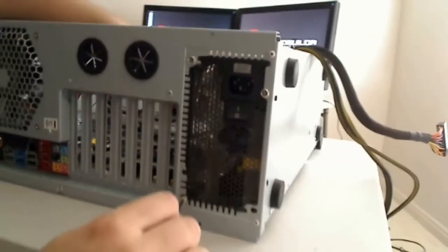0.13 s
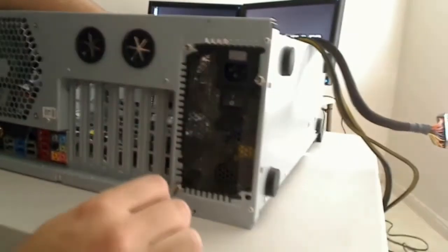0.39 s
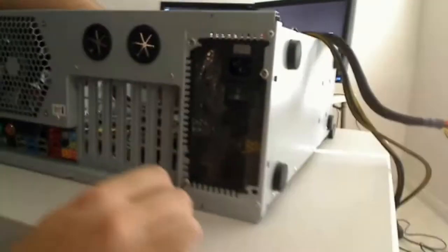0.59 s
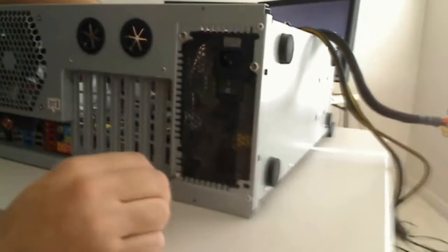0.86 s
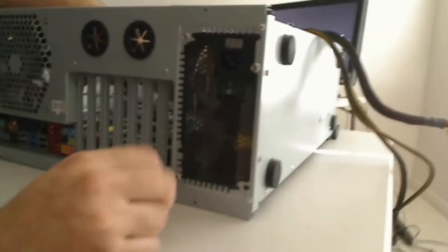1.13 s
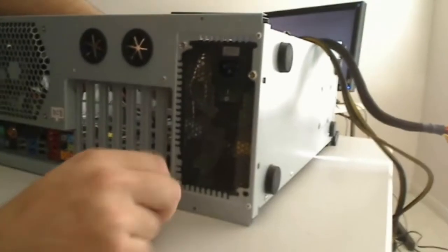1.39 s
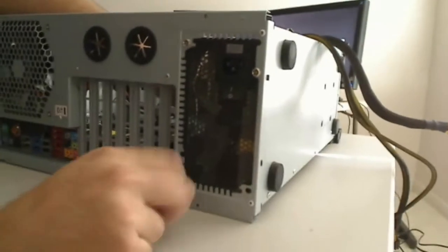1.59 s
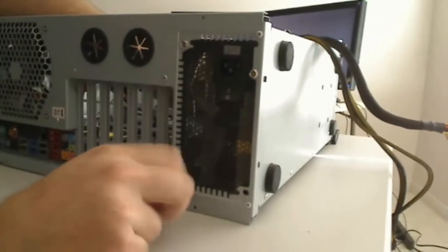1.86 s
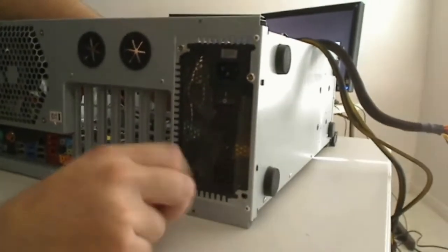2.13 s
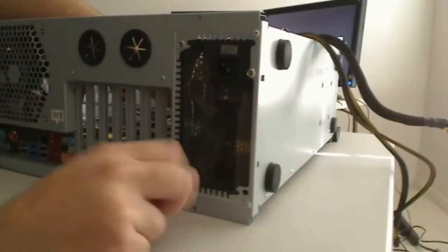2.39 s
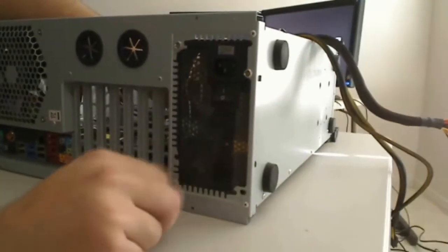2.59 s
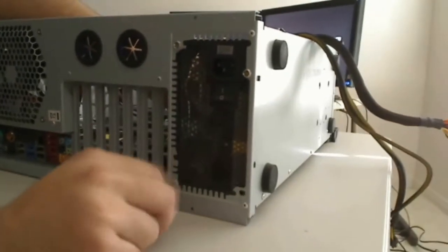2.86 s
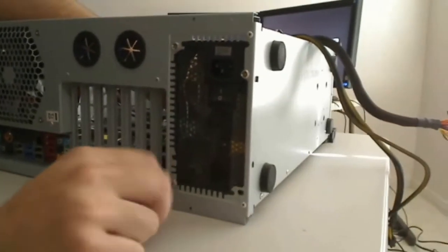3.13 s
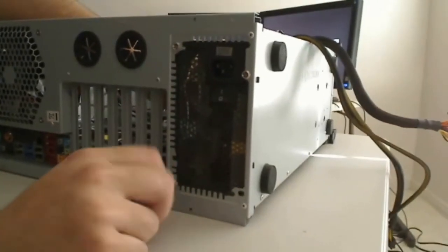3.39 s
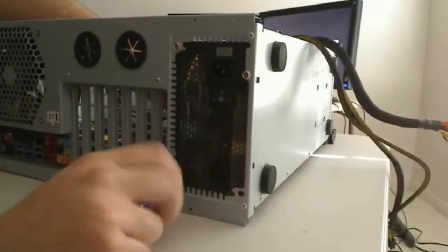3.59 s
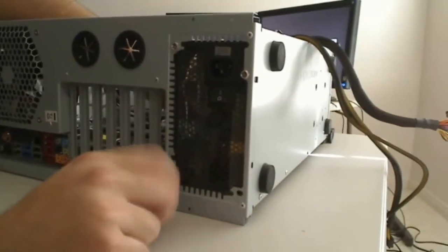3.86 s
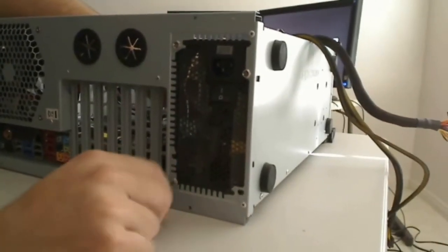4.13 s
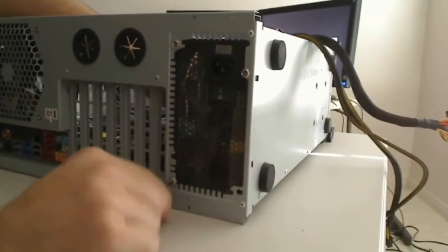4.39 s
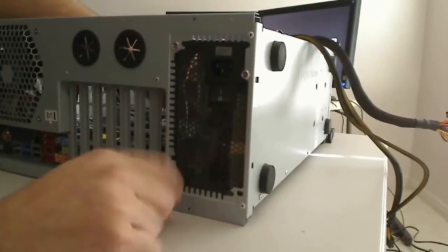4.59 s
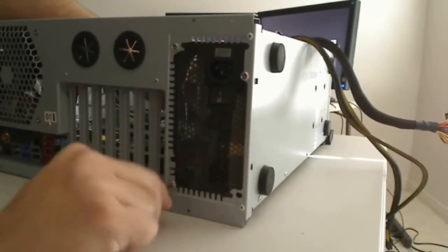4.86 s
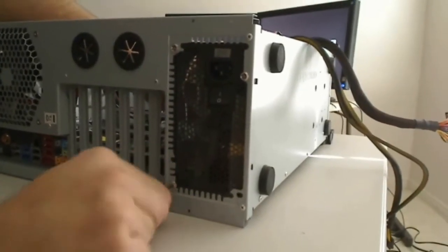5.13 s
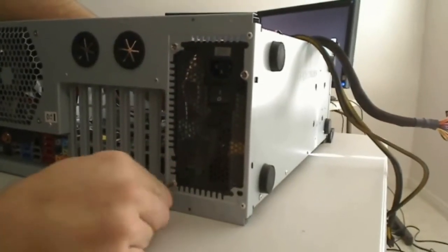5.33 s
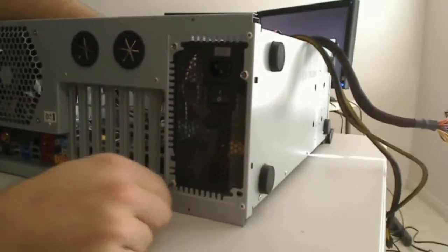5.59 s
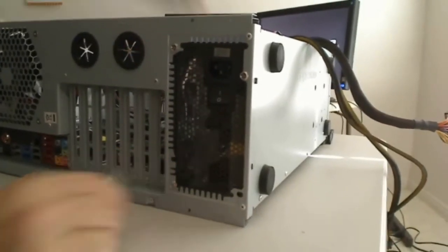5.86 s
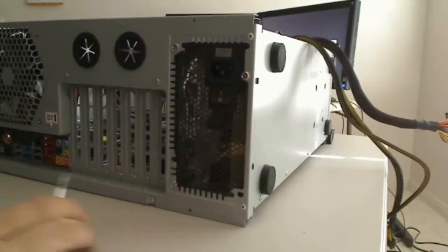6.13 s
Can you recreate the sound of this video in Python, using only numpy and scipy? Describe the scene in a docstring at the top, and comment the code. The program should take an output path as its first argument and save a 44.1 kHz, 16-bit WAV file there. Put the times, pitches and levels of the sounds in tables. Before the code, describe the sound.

A small screw is twisted into a thin steel case, with rapid bright clicks and gritty scratching in bursts over faint quiet room air.

```python
"""Screw turned into a computer case

A small screw is turned into the back of a steel computer case on a desk in a quiet room.
Each click of driver and screw feeds a short burst of energy into ringing bands of noise: the screw
briefly near 5 kHz, the sheet panels longer near 1 kHz. Scratching is a stream of tiny random grains
through the same bands. Jolts, soft bumps and a tail of echoes join in over a murmur of air and fans.
"""
import sys
import numpy as np
from scipy import signal
from scipy.io import wavfile

SR = 44100
rng = np.random.default_rng(int(sys.argv[2]) if len(sys.argv) > 2 else 0)


def store_pcm(level_fs):
    """Save levels as 16-bit WAV."""
    pcm = np.round(np.clip(level_fs, -1, 1) * 32767).astype(np.int16)
    wavfile.write(sys.argv[1], SR, np.atleast_2d(pcm).T)


def amplitude_ratio(level_db):
    """Convert a level in decibels to the matching linear amplitude (field) ratio."""
    exponent = np.asarray(level_db, float) / 20
    return 10 ** exponent


N = 274743   # length in samples

# metal touching metal: t/s, screw ring level/dB, panel knock level/dB, bright snap level/dB (before trims)
CONTACTS = [(.2344, -64, -54.5, -51), (.3351, -85, -61, -84), (.4262, -78, -62, -75), (.638, -80, -69, -76),
            (.694, -78, -69, -80), (.737, -82, -78, -78), (.844, -46, -67, -45), (.879, -53, -72.5, -65),
            (.8874, -40, -36, -33), (.892, -50, -35, -48), (1.0422, -61, -54, -60.5),
            (1.158, -67, -63, -64), (1.1739, -55, -60, -43), (1.179, -40, -33, -36),
            (1.2148, -51, -45, -44), (1.23, -53, -62, -48), (1.248, -52, -61, -48), (1.2843, -52, -57, -57),
            (1.3003, -48, -77, -64), (1.3535, -55, -71, -57), (1.424, -59, -78, -57.5),
            (1.4455, -56, -67.5, -59.5), (1.4685, -62, -61, -46.5), (1.4999, -56, -49, -48),
            (1.532, -52, -77, -50), (1.555, -69, -74, -49), (1.5768, -54.5, -67, -47),
            (1.592, -72, -52.5, -72), (1.6269, -46.5, -61, -58), (1.6836, -49.5, -60, -46),
            (1.7207, -44.5, -46, -47), (1.7713, -41, -53, -44), (1.7835, -43.5, -52, -39.5),
            (1.8038, -52, -48, -52.5), (1.8227, -51.5, -54.5, -44.5), (1.8596, -53, -80, -55),
            (1.8807, -42.5, -69, -54), (1.9058, -59, -75, -67.5), (1.9397, -48.5, -49, -34),
            (1.9653, -50, -43.5, -45), (1.9943, -42, -42.5, -58), (2.0156, -44, -43.5, -40.5),
            (2.062, -58.5, -65, -52), (2.1023, -56, -65, -48.5), (2.111, -41.5, -68, -46),
            (2.145, -49, -79.5, -54), (2.186, -56, -68, -47), (2.197, -52.5, -51.5, -43),
            (2.2212, -57.5, -39.5, -40.5), (2.249, -64, -48.5, -50.5), (2.26, -58, -71, -45.5),
            (2.2828, -55, -44, -47.5), (2.2942, -40, -53.5, -43.5), (2.3025, -31, -42, -28.5),
            (2.3122, -53, -35, -51), (2.346, -39.5, -60, -32.5), (2.3574, -32, -62, -32.5),
            (2.3672, -34.5, -45.5, -44), (2.414, -37.5, -47, -45), (2.456, -40.5, -52.5, -36),
            (2.481, -44, -43.5, -42.5), (2.5085, -61, -46, -49.5), (2.55, -50.5, -71, -50),
            (2.5576, -49.5, -49, -43.5), (2.565, -47.5, -73, -36.5), (2.5734, -34, -67, -38),
            (2.581, -43.5, -44, -38.5), (2.628, -29.5, -42.5, -30), (2.6415, -35.5, -52.5, -38),
            (2.6938, -45, -77, -48), (2.7117, -47, -80.5, -59), (2.748, -38.5, -41, -31.5),
            (2.786, -54, -42, -48), (2.796, -39.5, -62, -48), (2.8344, -41.5, -89, -47.5),
            (2.846, -43, -55, -41.5), (2.8702, -44.5, -65, -47.5), (2.9162, -49, -62, -47),
            (2.9262, -41, -56.5, -35.5), (2.9373, -43, -54, -45), (2.949, -47, -61, -46),
            (3.0334, -65, -58, -65), (3.0667, -65, -51, -48), (3.1502, -45, -61, -44.5),
            (3.1575, -44, -77, -60), (3.163, -55.5, -60, -46), (3.176, -45, -73, -51),
            (3.2206, -45.5, -54, -49), (3.24, -49.5, -78, -74), (3.2641, -44.5, -66, -47.5),
            (3.296, -46.5, -67.5, -52.5), (3.355, -45, -67.5, -51), (3.3763, -66, -75, -63),
            (3.404, -53.5, -71, -52), (3.4205, -55, -51.5, -44), (3.4313, -49.5, -41.5, -45),
            (3.4788, -42.5, -71, -37), (3.494, -38.5, -46, -47), (3.51, -50, -66, -45),
            (3.561, -52, -77, -61), (3.5852, -37, -37, -40), (3.622, -70, -67, -76),
            (3.6888, -68, -54, -58), (3.7118, -71, -56, -50), (3.7395, -69, -77, -44),
            (3.7616, -64, -54, -41), (3.778, -54, -64, -42), (3.8424, -50.5, -70, -52),
            (3.9648, -63, -57.5, -55), (3.9888, -76, -60, -86), (4.051, -55, -79, -61),
            (4.065, -42, -57.5, -43), (4.11, -40, -60, -43), (4.1436, -39.5, -60, -45.5),
            (4.1905, -45, -64, -52), (4.2045, -58, -48, -52), (4.2187, -46, -44, -48),
            (4.2393, -54, -66, -54), (4.2971, -71, -51.5, -51), (4.314, -47, -45.5, -46.5),
            (4.333, -61, -55.5, -56), (4.6326, -56, -50.5, -55), (4.6434, -45, -68, -46),
            (4.6544, -47, -47.5, -47), (4.737, -43, -47, -42), (4.7733, -52, -63, -48.5),
            (4.7916, -50, -72.5, -48), (4.8058, -55, -58, -65), (4.8295, -52, -65, -59),
            (5.345, -99, -74, -93.5), (5.6557, -76, -65, -64), (5.668, -47.5, -56, -54),
            (5.6847, -40, -51, -31.5), (5.7014, -46, -57.5, -38), (5.9825, -56, -81.5, -70),
            (5.9949, -53, -69, -56), (6.0086, -57, -72, -47), (6.016, -50, -82, -57),
            (6.0324, -49, -74, -51.5), (6.0549, -42, -55, -52), (6.0764, -38, -71, -54),
            (6.1131, -50, -72, -61)]
# twists of the fingers, thread and skin rubbing the steel:
# t/s of most pressure, length/s, screw side level/dB, panel side level/dB
TWISTS = [(0.188, 0.23, -61, -73), (0.453, 0.044, -60.5, -64.5), (0.624, 0.18, -82, -77),
          (0.953, 0.17, -75, -52), (1.064, 0.059, -63, -66), (1.264, 0.23, -59, -63),
          (1.528, 0.18, -53, -79), (1.801, 0.16, -45.5, -66), (2.021, 0.35, -50, -68),
          (2.234, 0.11, -45, -55), (2.303, .05, -35, -45), (2.36, .2, -43, -56.5),
          (2.607, 0.22, -52.5, -57.5), (2.784, 0.33, -58.5, -59.5), (3.1, 0.29, -67, -66.5),
          (3.214, 0.15, -78, -63.5), (3.431, 0.037, -44, -44), (3.49, 0.24, -57, -71.5),
          (3.63, 0.19, -84, -72), (3.756, 0.26, -60, -63), (4.055, .12, -70, -73), (4.242, 0.21, -64, -70),
          (4.464, 0.062, -63.5, -78), (4.644, 0.033, -49.5, -48.5), (4.792, 0.13, -59, -60.5),
          (5.745, 0.19, -58.5, -68.5), (6.028, .12, -74, -80)]
# the case is jolted on the desk: t/s, level/dB
JOLTS = [(.889, -37), (1.18, -39)]
# soft bumps of the hand on the desk: t/s, f/Hz, level/dB (before the swell)
BUMPS = [(.335, 223, -66.5), (.51, 433, -68), (5.815, 300, -65), (5.85, 300, -70)]

# Ringing parts, one cluster of close modes a row: f/Hz, width/Hz, relative level/dB, t60/s of its energy
# (t60 is the time to fall by 60 dB)
# screw and driver tip, with the screw in its hole
SCREW = [(4400, 220, -16, 0.011), (4836, 370, 3, 0.057), (5100, 53, -3.5, 0.039), (5225, 330, -1.5, .04)]
# sheet panels
PANEL = [(660, 60, -10, .07), (755, 22, -4, .08), (860, 50, -7, .06), (945, 35, 0, .08),
         (1030, 40, -5, .06), (1125, 25, 0, .08), (1250, 45, -1, .08), (1320, 40, -5, .06),
         (1427, 40, -3, .06), (1617, 30, -4, .06), (1950, 500, -1, .07)]
# the snap of the touching edges
SNAP = [(5750, 590, -7.5, 0.025), (6210, 260, -3.5, 0.03), (6800, 2200, -2, 0.017), (7900, 180, -11, 0.017),
        (8670, 330, -6, 0.044), (9370, 1100, 0.5, 0.0097), (10766, 120, 8.5, 0.047)]
# thin slot brackets
BRACKET = [(2020, 930, -2, 0.018), (2500, 1680, 2.5, 0.14), (3210, 360, 0, 0.081), (3920, 470, 4.5, 0.031),
           (4350, 130, -3, 0.074)]
# the whole shell of the case
SHELL = [(735, 290, -3, 0.27), (1850, 790, -1, 0.26), (2470, 600, -7, 0.15), (3620, 500, -9.5, 0.23)]

# after-ring of the steel away from the hand: f/Hz, t60/s
FREE_T60 = [(700, 0.36), (1300, 0.44), (3000, 0.19), (5200, 0.19), (10000, 0.12)]
# echoes of case cavity and room: f/Hz, t60/s
TAIL = [(400, 1), (1060, 0.11), (2790, 0.53), (7350, 0.073), (11000, 0.075)]
# colour of the room murmur: f/Hz, relative level/dB per Hz
MURMUR = [(12, -54), (20, -24.5), (107, -7.5), (192, -2), (309, 0.5), (353, -5), (403, 1), (473, -16),
          (513, -6), (849, -10.5), (1020, -12), (2500, -20.5), (7930, -28), (11500, -11.5), (15000, -75.5),
          (22000, -120)]

# touches
CONTACT_S, RISE_SHARE = 0.00028, 0.22   # time of dying away; rise time as a share of it
CHATTER_DB = -5   # random spread of the push within a touch (the sign does not matter)
MODE_SCATTER_DB = 3   # random spread of each cluster from touch to touch
SCREW_DB, PANEL_DB, SNAP_DB, BRACKET_DB = 0.5, 3, 9, -0.5   # level trims
TICK_DB = 13.5   # the unrung tick at first touch, relative to the snap
BROAD_HZ = (1467, 11900)   # the unrung part of ticks and rubbing
THUMP_DB, THUMP_HZ = 10.5, 300   # level trim and upper edge
LIFTED_S, LIFTED_PITCH, LIFTED_WIDTH = 5.9, 1.06, 0.59   # out of the hole: from when, higher, narrower
# panel modes outside CORE_HZ fall behind (dB per dB) in knocks lighter than a heavy one
CORE_HZ, DEEP_GROWTH, HEAVY_DB = (800, 1500), 0.35, -24
# the brackets rattle with knock and snap alike; the first grows in dB per dB of knock
RATTLE_GROWTH, BRACKET_BELOW_KNOCK_DB, BRACKET_BELOW_SNAP_DB = 1.083, -2.5, -9.5
# after-ring relative to the touch; it grows (dB per dB) with the rattle above a firm one
FREE_DB, FREE_GROWTH, FIRM_DB = -15, 0.23, -52.5

# rubbing
SLIPS_PER_S, SLIP_DB, SLIP_SPREAD_DB = 30, -6, 4.5   # catches of the thread, relative to the rubbing
TWIST_RISE_SHARE, TWIST_DEPTH_DB = 0.41, 17   # share of length spent pressing on; level lost at either end
GRAINS_PER_S, GRAIN_SPREAD_DB = 6000, 3.0
CLUMP_DB, CLUMPS_PER_S = 3.5, 80   # clumping of the grains at full grit; its rate of wander
GRITTY_FROM_DB, GRITTY_RANGE_DB = -61, 1   # light rubbing is smooth, hard rubbing sticks and slips
RUB_SNAP_DB, RUB_BROAD_DB = -1, -4   # relative to the screw's part

# surroundings
TAIL_DB = -19.5   # relative to the steel
MURMUR_DB = -68
MURMUR_FLICKER_DB, FLICKER_FADES_HZ = 4, 1198   # flicker in the bass; above this f the murmur is steadier
MAINS_HZ, MAINS_DB = 60, -89.5
ROUNDING = 0.16   # amplitude where peaks level off
CUTOFF_HZ = 10317


def clicks():
    """Driver and screw touch the steel: each touch rings the parts, ticks and rocks the case."""
    s, screw_db, panel_db, snap_db = np.r_[CONTACTS, slips()].T
    places, power = touches(s)

    # rattle driven by knock and by snap, added as power
    from_knock_db = HEAVY_DB + RATTLE_GROWTH * (panel_db - HEAVY_DB) + BRACKET_BELOW_KNOCK_DB
    from_snap_db = snap_db + BRACKET_BELOW_SNAP_DB
    bracket_db = 10 * np.log10(amplitude_ratio(2 * from_knock_db) + amplitude_ratio(2 * from_snap_db))
    free_db = FREE_DB + FREE_GROWTH * (bracket_db - FIRM_DB)

    # the case rocks on the desk
    pushes = np.sqrt(on_timeline(places, power * amplitude_ratio(2 * bracket_db)[:, None]))
    thump = amplitude_ratio(THUMP_DB) * band(band(pushes, 21, THUMP_HZ), 21, THUMP_HZ)

    tick_envelope = np.sqrt(on_timeline(places, power * amplitude_ratio(2 * snap_db)[:, None]))
    ticks = tick_envelope * rng.standard_normal(N)

    lifted = s[:, None] > LIFTED_S
    loose_screw = [(hz * LIFTED_PITCH, width_hz * LIFTED_WIDTH, db, t60)
                   for hz, width_hz, db, t60 in SCREW]
    parts = [(SCREW, power * ~lifted, screw_db + SCREW_DB),
             (loose_screw, power * lifted, screw_db + SCREW_DB),
             (PANEL, power, panel_db + PANEL_DB),
             (SNAP, power, snap_db + SNAP_DB),
             (BRACKET, power, bracket_db + BRACKET_DB)]
    rung = sum(struck(modes, places, fed, level_db, free_db) for modes, fed, level_db in parts)
    return rung + amplitude_ratio(TICK_DB) * band(ticks, *BROAD_HZ) + thump


def slips():
    """The thread catches at random moments, louder where it rubs harder; rows as in CONTACTS."""
    waits = -np.log(1 - rng.random(1000))
    spread = rng.standard_normal((1000, 3))
    s = np.cumsum(waits) / SLIPS_PER_S
    inside = s < N / SR
    s = s[inside]
    screw_db, panel_db = (level[(s * SR).astype(int)] for level in twists())
    levels_db = np.c_[screw_db, panel_db, screw_db] + SLIP_DB + SLIP_SPREAD_DB * spread[inside]
    return np.c_[s, levels_db]


def touches(s):
    """Each contact feeds in unit energy, rising fast, dying away and chattering as it goes."""
    span = np.arange(600)
    chatter = np.repeat(rng.standard_normal((len(s), 15)), 40, axis=1)   # a new value every 40 samples
    length = CONTACT_S * SR
    rise = 1 - np.exp(-span / (RISE_SHARE * length))
    power = np.exp(-span / length) * rise * amplitude_ratio(CHATTER_DB * chatter)
    places = np.minimum(np.round(s[:, None] * SR).astype(int) + span, N - 1)
    return places, power / power.sum(axis=1, keepdims=True)


def on_timeline(places, power):
    """Add up the power of all contacts, sample by sample."""
    return np.bincount(places.ravel(), power.ravel(), N)


def struck(modes, places, power, level_db, free_db):
    """Every contact drives each cluster with a strength of its own."""
    scatter = rng.normal(0, MODE_SCATTER_DB, (len(power), len(modes)))
    total = np.sum(amplitude_ratio(2 * np.array(modes)[:, 2]))
    lightness_db = np.clip(level_db - HEAVY_DB, -30, 0)
    out = np.zeros(N)
    for k, (hz, width_hz, mode_db, t60) in enumerate(modes):
        outside_core = hz < CORE_HZ[0] or CORE_HZ[1] < hz < 2 * CORE_HZ[1]
        lag_db = DEEP_GROWTH * lightness_db * (outside_core and modes is PANEL)
        cluster_db = level_db + mode_db + lag_db + scatter[:, k]
        fed = power * amplitude_ratio(2 * cluster_db)[:, None] / total
        fed_free = fed * amplitude_ratio(2 * free_db)[:, None]
        out += ring(on_timeline(places, fed), on_timeline(places, fed_free), hz, width_hz, t60)
    return out


def ring(power, free_power, hz, width_hz, t60):
    """Close modes beat at random; energy dies fast under the hand, slowly in the free steel."""
    stored = 0
    for fed, decay_s in ((power, t60), (free_power, at_hz(FREE_T60, hz))):
        kept = amplitude_ratio(-120 / (decay_s * SR))   # share of energy left after one sample
        stored = stored + signal.lfilter([1], [1, -kept], fed + 1e-24)
    return resonance(np.sqrt(stored) * rng.standard_normal(N), hz, width_hz)


def resonance(x, hz, width_hz):
    """Two-pole resonance; white noise keeps its rms."""
    r = np.exp(-np.pi * width_hz / SR)
    peak = signal.lfilter([1, 0, -1], [1, -2 * r * np.cos(2 * np.pi * hz / SR), r * r], x)
    return peak * np.sqrt((1 - r * r) / 2)


def at_hz(points, hz):
    """Read a table on a log-frequency axis."""
    table = np.array(points)
    return np.interp(np.log(hz), np.log(table[:, 0]), table[:, 1])


def band(x, low_hz, high_hz):
    """Let through only what lies between two frequencies (order-2 Butterworth design)."""
    edges_hz = [low_hz, min(high_hz, .45 * SR)]
    return signal.sosfilt(signal.butter(2, edges_hz, "band", fs=SR, output="sos"), x)


def scratch():
    """Rubbing is a dense stream of clumped grains, coloured by the same resonances."""
    screw_db, panel_db = twists()
    grit = np.clip((screw_db - GRITTY_FROM_DB) / GRITTY_RANGE_DB, .1, 1)
    sizes = amplitude_ratio(GRAIN_SPREAD_DB * np.minimum(rng.exponential(1, N), 4)) * rng.choice([-1, 1], N)
    present = rng.random(N) < GRAINS_PER_S / SR
    grains = sizes * present * amplitude_ratio(grit * CLUMP_DB * drift(CLUMPS_PER_S))

    def rung(modes):
        """Grains through all clusters of one part, at unit rms."""
        return rms_one(sum(amplitude_ratio(db) * resonance(grains, hz, width_hz) for hz, width_hz, db, _ in modes))

    unrung = rms_one(band(grains, *BROAD_HZ))
    bright = rung(SCREW) + amplitude_ratio(RUB_SNAP_DB) * rung(SNAP) + amplitude_ratio(RUB_BROAD_DB) * unrung
    return amplitude_ratio(screw_db) * rms_one(bright) + amplitude_ratio(panel_db) * rung(PANEL)


def twists():
    """Rubbing level on the screw and panel sides: each twist swells and eases off."""
    s, length, *levels = np.array(TWISTS).T[:, :, None]
    late = (np.arange(0, N + 40, 40) / SR - s) / length   # worked out every 40 samples
    from_peak = np.maximum(-late / TWIST_RISE_SHARE, late / (1 - TWIST_RISE_SHARE))
    shape_db = np.maximum(-TWIST_DEPTH_DB * from_peak ** 2, -60)
    coarse = np.arange(late.shape[1])
    # where twists overlap, the loudest counts
    return [np.interp(np.arange(N) / 40, coarse, np.max(db + shape_db, axis=0)) for db in levels]


def drift(rate):
    """Slow random wander of unit spread: smoothed noise, made every 40 samples."""
    r = np.exp(-80 * np.pi * rate / SR)
    noise = rng.standard_normal(N // 40 + 2002)
    slow = signal.lfilter([1], [1, -2 * r, r * r], noise)[2000:]   # drop the start-up
    return np.interp(np.arange(N) / 40, np.arange(len(slow)), rms_one(slow))


def rms_one(x):
    """Scale to unit rms, the usual measure of average strength."""
    return x / np.sqrt(np.mean(x ** 2) + 1e-20)


def jolts():
    """Each jolt fills the shell with energy that dies cluster by cluster."""
    power = np.zeros(N)
    for s, db in JOLTS:
        power[int(s * SR)] = amplitude_ratio(2 * db)
    no_free = np.zeros(N)
    return sum(amplitude_ratio(db) * ring(power, no_free, hz, width_hz, t60) for hz, width_hz, db, t60 in SHELL)


def bumps():
    """Dull short rings of the desk top: sines that swell and die within milliseconds."""
    t = np.arange(N) / SR
    out = np.zeros(N)
    for s, hz, db in BUMPS:
        swell = np.clip((t - s) / 0.0041, 0, 50) * np.exp(1 - np.clip((t - s) / 0.0089, 0, 50))
        out += amplitude_ratio(db) * swell * np.sin(2 * np.pi * hz * (t - s))
    return out


def tail(x):
    """Diffuse echoes that swell in a few ms and die band by band."""
    t = np.arange(SR // 2) / SR
    edges = 200 * 2 ** np.arange(0, 6.1, .5)   # half octaves
    echoes = np.zeros(len(t))
    for low, high in zip(edges, edges[1:]):
        decay = amplitude_ratio(-60 * t / at_hz(TAIL, np.sqrt(low * high)))
        echoes += band(rng.standard_normal(len(t)), low, high) * decay
    echoes *= 1 - np.exp(-t / 0.0013)
    return signal.fftconvolve(x, echoes / np.sqrt(np.sum(echoes ** 2)))[:N]


def murmur():
    """Half-octave bands of noise, each flickering a little, and a faint mains hum."""
    out = np.zeros(N)
    edges = 20 * 2 ** np.arange(0, 9.6, .5)
    white = rng.standard_normal((2, N + SR))   # neighbouring bands use different noise
    for k, (low, high) in enumerate(zip(edges, edges[1:])):
        flicker_db = MURMUR_FLICKER_DB / (1 + low / FLICKER_FADES_HZ) * drift(11)
        level_db = at_hz(MURMUR, np.sqrt(low * high)) + flicker_db
        out += amplitude_ratio(level_db) * band(white[k % 2], low, high)[SR:]   # drop the start-up
    hum = np.sqrt(2) * np.sin(2 * np.pi * MAINS_HZ * np.arange(N) / SR)
    return amplitude_ratio(MURMUR_DB) * rms_one(out) + amplitude_ratio(MAINS_DB) * hum


def scene():
    """Clicks, scratching and jolts with their tail, then bumps, over the murmur."""
    steel = clicks() + scratch() + jolts()
    return (steel + amplitude_ratio(TAIL_DB) * tail(steel) + bumps() + murmur())[None, :]


def low_pass(x):
    """Removes everything above the highest recorded frequency."""
    return signal.sosfilt(signal.butter(12, 12180, fs=SR, output="sos"), x)


def record(dry):
    """The loudest peaks are rounded, then the top is cut steeply."""
    rounded = ROUNDING * np.tanh(dry / ROUNDING)
    steep = signal.cheby1(10, .5, CUTOFF_HZ, fs=SR, output="sos")
    mix = signal.sosfilt(steep, rounded)
    return low_pass(mix)


dry = scene()
out = record(dry)
store_pcm(out)
```